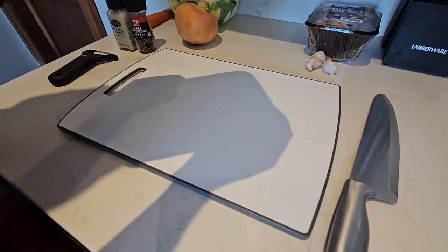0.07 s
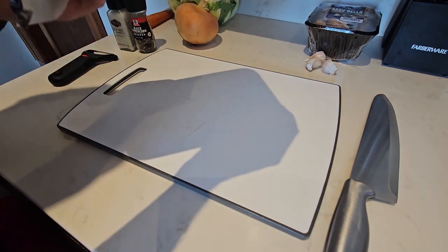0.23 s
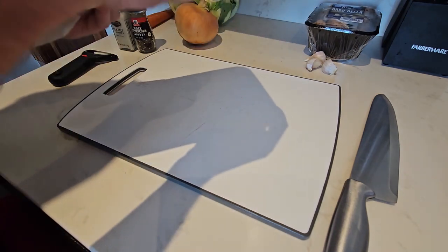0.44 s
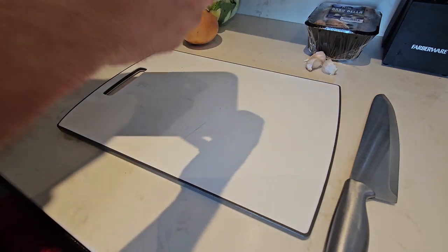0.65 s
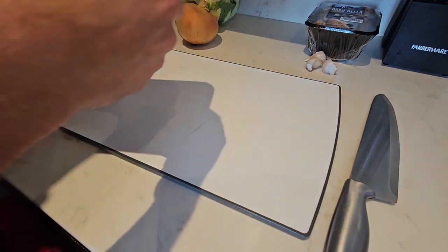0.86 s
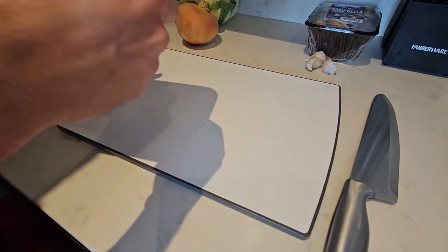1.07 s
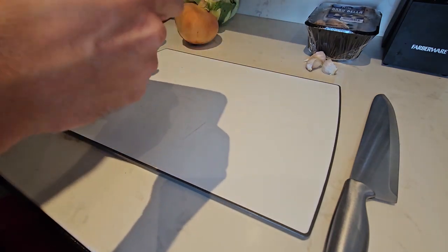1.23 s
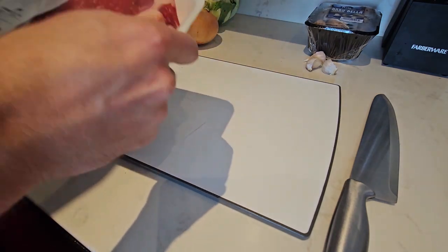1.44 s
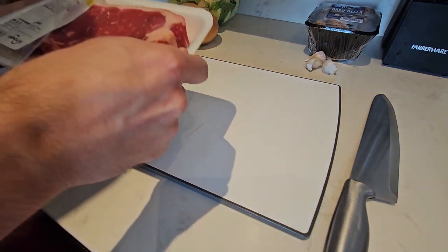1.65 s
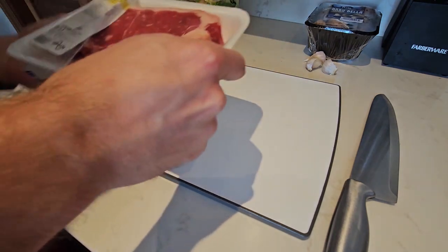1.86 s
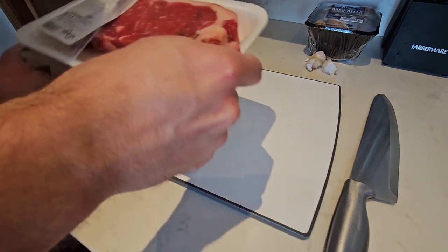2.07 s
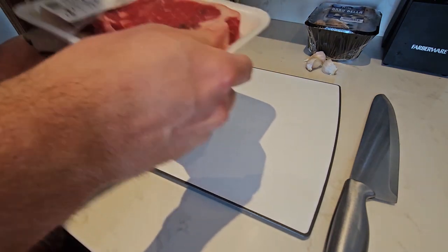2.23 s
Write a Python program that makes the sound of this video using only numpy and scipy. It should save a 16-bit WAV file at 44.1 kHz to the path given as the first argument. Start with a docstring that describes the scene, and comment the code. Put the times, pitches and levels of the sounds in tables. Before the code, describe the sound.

Plastic cling film crinkles and snaps as it is pulled off a foam tray, close up

```python
"""Cling film is pulled off a foam meat tray over a kitchen counter, close by and a little to the left.
Creases in the taut film snap as single clicks, and the stuck film lets go in hollow pops through the tray's modes.
Slack film rustles in random clicks and hiss, slips rub on the foam, and two loud snaps set the stiff rim ringing.
Hands shift and bump the tray; the counter scatters each crack, and a small, humming kitchen rings after it."""
import sys
import numpy as np
from scipy import signal
from scipy.fft import rfft, irfft
from scipy.io import wavfile

SR = 44100
rng = np.random.default_rng(int(sys.argv[2]) if len(sys.argv) > 2 else 0)


def wav_record(signal):
    """Record a signal, one row per channel, as 16-bit PCM in the file named by sys.argv[1]."""
    frames = np.transpose(np.atleast_2d(signal))
    bounded = np.clip(frames, -1, 1)
    # unit amplitude maps onto the largest positive 16-bit level
    quanta = np.round(bounded * 32767).astype(np.int16)
    wavfile.write(sys.argv[1], SR, quanta)


N = 101429  # length in samples, 2.3 s
HZ = np.fft.rfftfreq(4096, 1 / SR)  # frequencies at which the clicks are drawn


def amp(db):
    """Decibels to gain."""
    return 10 ** (np.asarray(db) / 20)


def unit(x):
    """Scales to an rms of one."""
    return x / np.sqrt(np.mean(x ** 2) + 1e-20)


def read(points, hz, axis=1):
    """Reads a column of a table along log frequency."""
    table = np.transpose(points)
    return np.interp(np.log(hz + 1), np.log(table[0] + 1), table[axis])


def add(mix, s, sound):
    """Mixes a stereo sound in at a time in seconds, cut off at the end of the mix."""
    part = mix[:, max(round(s * SR), 0):][:, :sound.shape[1]]
    part += sound[:, :part.shape[1]]


def pulse(db):
    """The sharpest causal (minimum-phase) click with this spectrum."""
    log_gain = np.log(amp(np.maximum(db, -100)))
    mirrored = np.r_[log_gain, log_gain[-2:0:-1]]
    return np.fft.ifft(np.exp(np.conj(signal.hilbert(mirrored)))).real


def ringing(modes):
    """Spectrum in dB of a body whose damped modes add in power."""
    power = 0
    for hz, width, db in modes:
        detuning = (HZ ** 2 - hz ** 2) / ((HZ + 1) * width)
        power = power + amp(db) ** 2 / (1 + detuning ** 2)
    return 10 * np.log10(power)


# Left-right likeness of diffuse sound. Each row: frequency in Hz, likeness from 0 to 1.
LIKENESS = [(30, 0.9), (130, 0.98), (300, 0.86), (600, 0.74), (1200, 0), (16000, 0.2)]


def diffuse(size):
    """Noise from all around: alike at both microphones in the bass, largely unrelated in the treble."""
    same = np.clip(read(LIKENESS, np.fft.rfftfreq(size, 1 / SR)), -1, 1)
    left, other = rfft(rng.standard_normal((2, size)))
    right = same * left + np.sqrt(1 - same ** 2) * other
    return irfft(np.array([left, right]), size)


SNAP_SCATTER_DB, POP_SCATTER_DB = 7, 2  # scatter against the direct sound
NEAR_S, FAR_S, FAR_DB = 0.0017, 0.012, -5  # decay times of the two parts of the scatter, start of the slow one
PAN_DB, LEFT_LEAD_S = 0.21, .00026  # left raised and right lowered by this; left arrives first
# First reflections off the counter and the hand. Each row: delay in seconds, strength against the direct sound.
FIRST_REFLECTIONS = [(.0007, 0.22), (.0014, 0.26), (.0024, 0.2)]


def paths(scatter_db):
    """Direct sound, first reflections and a quick spray of scatter, as they reach each microphone."""
    t = np.arange(4096) / SR
    decay = np.exp(-t / NEAR_S) + amp(FAR_DB) * np.exp(-t / FAR_S)
    spray = diffuse(len(t)) * decay * (1 - np.exp(-t / 0.00033))
    taps = amp(scatter_db) * spray / np.linalg.norm(spray[0])
    taps[:, 0] += 1  # direct sound
    for delay, strength in FIRST_REFLECTIONS:
        taps[:, round(delay * rng.uniform(.85, 1.15) * SR)] += strength
    taps[1] = np.roll(taps[1], round(LEFT_LEAD_S * SR))
    return taps / np.linalg.norm(taps[0]) * amp([[PAN_DB], [-PAN_DB]])


def grains(per_s, spread_db, count=6):
    """Random clicks of uneven size, shared out over several patches of film with their own paths."""
    out = np.zeros((2, N))
    for _ in range(count):
        size_db = spread_db * np.minimum(rng.exponential(1, N), 5.5)
        sizes = amp(size_db) * rng.choice([-1, 1], N)
        clicks = sizes * (rng.random(N) < per_s / count / SR)
        out += signal.fftconvolve(paths(SNAP_SCATTER_DB), clicks[None])[:, :N]
    return unit(out)


def shaped(drive, spectrum_db, curve):
    """Colours a sound and makes it follow a level curve."""
    sound = signal.fftconvolve(drive, pulse(spectrum_db)[None])[:, :N]
    return unit(sound) * amp(np.interp(np.arange(N) / SR, *np.transpose(curve)))


RUSTLE_DB = 2  # trim on the level curve
CRINKLES_PER_S, CRINKLE_SPREAD_DB, HISS_SHARE = 2200, 4.5, 0.68  # hiss as rms against the crinkles
# Swell of the slack film. Each row: time in seconds, level in dB before the trim.
RUSTLE_CURVE = [(0, -44.5), (.085, -55.5), (.14, -49), (.21, -52.5), (.33, -56.5), (.39, -57), (.5, -49),
                (.62, -52.5), (.76, -51.5), (.795, -58), (.85, -49), (.96, -57.5), (.995, -46), (1.10, -53),
                (1.139, -62), (1.21, -57), (1.248, -46.5), (1.30, -50), (1.379, -60.5), (1.5, -62),
                (1.73, -63.5), (1.785, -48.5), (1.83, -57), (1.89, -49), (1.94, -85), (2.0, -60),
                (2.08, -49), (2.16, -55.5), (2.21, -59), (2.29, -54.5)]
# Colour of the rustle. Each row: frequency in Hz, relative gain in dB.
RUSTLE_COLOUR = [(100, -41), (350, 0.5), (600, 3.5), (850, -6), (1300, 2.5), (2500, 3), (4500, 3.5),
                 (7500, 1.5), (10000, -2), (13000, -1), (16000, -3.5)]


def rustle():
    """Tiny crinkles over the hiss of film sliding on itself."""
    crinkles = grains(CRINKLES_PER_S, CRINKLE_SPREAD_DB)
    hiss = HISS_SHARE * rng.standard_normal((2, N))
    return amp(RUSTLE_DB) * shaped(crinkles + hiss, read(RUSTLE_COLOUR, HZ), RUSTLE_CURVE)


RUB_DB = -1.5  # trim on the level curve
RUB_GRAINS_PER_S, RUB_SPREAD_DB = 700, 3
# Fingers and film on the foam. Each row: time in seconds, level in dB before the trim.
RUB_CURVE = [(0, -59), (.06, -64), (.12, -49.5), (.24, -48), (.34, -69), (.95, -58), (1.02, -53),
             (1.14, -62), (1.21, -66), (1.24, -44.5), (1.34, -41), (1.45, -72), (1.62, -50), (1.80, -65),
             (1.90, -49.5), (1.95, -74), (2.20, -72), (2.28, -50.5)]
# Modes of the foam tray, also heard in the pops. Each row: frequency in Hz, width in Hz, relative level in dB.
TRAY_MODES = [(430, 98, -4), (539, 14, -14), (650, 72, -0.5), (620, 110, -0.5), (980, 73, 0.5),
              (1074, 86, -4.5), (1440, 103, -3), (1764, 72, -1.5), (2400, 1100, -11), (3186, 146, -8.5),
              (4680, 240, -11), (7900, 1200, -27.5), (13200, 1300, -35)]
# Colour of the foam, shared by rubbing and pops. Each row: frequency in Hz, relative gain in dB.
FOAM_COLOUR = [(60, -28), (200, -5.5), (320, -7), (420, 2), (1000, 0), (5000, -1.5), (16000, 1)]


def rubbing():
    """Small slips of fingers and film on the foam sound through the modes of the tray."""
    slips = grains(RUB_GRAINS_PER_S, RUB_SPREAD_DB)
    return amp(RUB_DB) * shaped(slips, ringing(TRAY_MODES) + read(FOAM_COLOUR, HZ), RUB_CURVE)


# Dull noise as the grip shifts. Each row: time in seconds, level in dB.
HANDLING_CURVE = [(0, -46), (.07, -49), (.16, -58), (.3, -60), (.4, -82), (1.2, -80), (1.3, -46),
                  (1.45, -68), (1.7, -70), (1.8, -66), (2.2, -61), (2.29, -59)]
# Colour of the handling. Each row: frequency in Hz, relative gain in dB.
HANDLING_COLOUR = [(60, -31), (180, -18), (320, 1.5), (480, -1.5), (650, -15.5), (900, -8), (2000, -48),
                   (16000, -69)]


def handling():
    """Hands sliding under the loaded tray: diffuse noise with the treble filtered away."""
    return shaped(diffuse(N), read(HANDLING_COLOUR, HZ), HANDLING_CURVE)


HUM_DB = -53  # rms level
# Colour of the kitchen hum. Each row: frequency in Hz, relative density in dB per Hz.
HUM_COLOUR = [(15, -33), (25, 3.5), (38, -26), (60, -3.5), (88, -3), (105, -6), (125, -2), (170, -4.5),
              (220, -1), (310, 0.5), (420, -6), (550, -14.5), (800, -19.5), (1500, -26.5), (3000, -23),
              (8000, -40), (16000, -65)]


def hum():
    """Steady low noise of the kitchen, from all around."""
    gain = amp(read(HUM_COLOUR, np.fft.rfftfreq(N, 1 / SR)))
    return amp(HUM_DB) * unit(irfft(rfft(diffuse(N)) * gain, N))


CREASE_RING_DB, CREASE_WIDTH_OCT = 1.5, 0.26  # boost at the crease's own pitch, and its reach to either side
# Creases snapping. Each row: start in seconds, relative level in dB, pitch of the crease in Hz,
# slope above it in dB per octave, floor in dB for the body below it.
CREASE_SNAPS = [(0.052, -11, 2480, -2.5, -5), (0.0556, -8, 2130, -2, -3.5), (0.13, -20, 3000, 3, -8),
                (0.1395, -8.5, 1390, -1, -13), (0.144, -10, 1850, -1, -22), (0.1924, -7, 11500, 5, -8),
                (.2434, 6.5, 1390, -11.5, -5.5), (0.3573, -6, 1180, -0.5, -5),
                (0.3622, 4, 2260, -0.2, -5.5), (.4513, 13.5, 2600, -6.5, -11), (0.555, 4, 1430, -2, -4.5),
                (.5650, 10, 2020, -9.5, -19), (0.722, -9, 1560, -8, -20), (0.8382, -6.5, 1530, -2.5, -7),
                (0.843, 3.5, 1520, -4.5, -9), (0.9293, -6.5, 1400, -5, -3.5), (.984, -10, 4970, -1, -0.5),
                (1.043, 4.5, 1070, -5, -2.5), (1.3012, 5, 5070, -6, -1), (1.5642, 12, 1460, -2, -4),
                (1.7702, -6.5, 5880, -16, -11), (1.8518, 1.5, 4610, -6.5, -11), (1.8968, -12, 3660, -8, 3),
                (1.9041, -7.5, 2940, -3.5, 0), (2.0186, 3, 3940, -4, -16), (2.0537, -11, 3860, -20, 0.5),
                (2.0634, -5.5, 4800, -11, -8)]
# Colour that all snaps share. Each row: frequency in Hz, relative gain in dB.
FILM_COLOUR = [(60, -30), (200, 0.5), (310, -8), (430, 5), (600, 2.5), (830, -6), (1250, 1), (2800, -0.5),
               (6200, -0.5), (7700, 0), (10000, -2.5), (13000, 0.5), (16000, -6.5)]


def snaps():
    """Each crease buckles in one click, with a boost around its own pitch."""
    out = np.zeros((2, N))
    for s, level_db, hz, slope_db, body_db in CREASE_SNAPS:
        octaves = np.log2((HZ + 1) / hz)
        above = slope_db * np.maximum(octaves, 0)
        below = np.maximum(10 * np.minimum(octaves, 0), body_db)  # falls 10 dB per octave to its floor
        ring = CREASE_RING_DB * np.exp(-(octaves / CREASE_WIDTH_OCT) ** 2)
        click = pulse(level_db + above + below + ring + read(FILM_COLOUR, HZ))
        add(out, s, signal.fftconvolve(paths(SNAP_SCATTER_DB), click[None]))
    return out


POP_PAN_DB = 0.5  # further lean to the left: left raised, right lowered
# Film letting go of the foam. Each row: start in seconds, relative level in dB, brightness in dB per octave,
# pitch of the tray as the grip changes, as a ratio.
FILM_POPS = [(.101, -5, 0.27, 1.26), (.2475, -2.5, -2.4, 1.33), (.2842, -7, -1.5, 1.35),
             (1.1161, 7, 0.96, 0.79), (1.226, 1.5, 2.6, 0.88), (1.2878, -2, -3.1, .98),
             (1.3259, 8, -2.3, 0.99), (1.3409, 7.5, -.8, 1.02), (1.3563, 11, -1.4, .99),
             (1.4125, 16.5, 0.61, 1.02), (1.444, 11, -0.5, 1.01), (1.5156, 17, -0.44, 0.99),
             (1.5285, 11, -0.95, 0.9), (1.5477, 15, -0.64, 1.02), (1.5621, 12, -0.94, 0.98),
             (1.5955, 14.5, -1.3, .99), (1.6615, 16, 0.6, 1.02), (2.066, .5, -0.46, 0.95),
             (2.227, -6, -1.9, 1.1)]


def pops():
    """Each release of the film kicks the light, well-damped tray."""
    octaves = np.log2(np.maximum(HZ, 300) / 1000)  # tilt turns about 1 kHz and levels off below 300 Hz
    out = np.zeros((2, N))
    for s, level_db, bright_db, ratio in FILM_POPS:
        modes = [(hz * ratio, width, db) for hz, width, db in TRAY_MODES]
        tray_db = ringing(modes) + read(FOAM_COLOUR, HZ)
        kick = pulse(level_db + tray_db + bright_db * octaves)
        add(out, s, signal.fftconvolve(paths(POP_SCATTER_DB), kick[None]))
    return out * amp(np.array([[1], [-1]]) * POP_PAN_DB)


# The rim ringing with two loud snaps. Each row: start in seconds, relative level in dB.
RIM_RINGS = [(.4514, 21.5), (.5649, 4)]
# Modes of the rim. Each row: frequency in Hz, width in Hz, relative level in dB.
RIM_MODES = [(577, 70, -7), (1110, 91, -5.5), (1233, 110, -6), (1755, 140, 1.5), (2300, 450, -2),
             (2800, 60, 3.5), (3420, 390, -3.5)]


def rim_rings():
    """Two loud snaps set the tray's stiff rim ringing for a moment."""
    out = np.zeros((2, N))
    for s, level_db in RIM_RINGS:
        ring = pulse(level_db + ringing(RIM_MODES))
        add(out, s, signal.fftconvolve(paths(POP_SCATTER_DB), ring[None]))
    return out


# The tray bumped in the hands. Each row: start in seconds, level in dB before the envelope,
# pitch in Hz, decay time in seconds.
TRAY_BUMPS = [(1.302, -24.5, 380, 0.0078), (1.301, -30.5, 176, 0.0079)]


def bumps():
    """Dull, quickly dying knocks of the loaded tray, as soft-edged sine bursts in the centre."""
    out, t = np.zeros((2, N)), np.arange(SR // 4) / SR
    for s, level_db, hz, ring in TRAY_BUMPS:
        envelope = np.exp(-t / ring) * (1 - np.exp(-t / 0.00091))
        knock = amp(level_db) * np.sin(2 * np.pi * hz * t) * envelope
        add(out, s, np.tile(knock, (2, 1)))
    return out


# Kitchen reverberation. Each row: frequency in Hz, time to fall 60 dB in seconds, relative level in dB.
KITCHEN_ROOM = [(150, 0.59, -16), (550, 0.51, -8.5), (1170, 1, -13.5), (2880, 0.68, -11.5),
                (6000, 0.56, -11.5), (15000, .3, -13.5)]


def kitchen(x, build_s=0.0067):
    """A diffuse tail that builds quickly, lingers in the upper middle and dies soonest in the top treble."""
    hz, t, z = signal.stft(diffuse(SR), SR, nperseg=256)
    t60 = read(KITCHEN_ROOM, hz)[:, None]
    # the square root keeps a band's level from growing with its decay time
    fade = np.exp(-np.log(1000) * t / t60) * np.sqrt(2 * np.log(1000) / t60 / SR)
    level = amp(read(KITCHEN_ROOM, hz, axis=2))[:, None]
    tail = signal.istft(z * fade * level, SR, nperseg=256)[1]
    tail = tail * (1 - np.exp(-(np.arange(tail.shape[1]) / SR / build_s) ** 2))
    return signal.fftconvolve(x, tail, axes=1)[:, :N]


def scene():
    """Film and tray ring in the kitchen; handling and hum stay without its tail."""
    near = rustle() + rubbing() + snaps() + pops() + rim_rings() + bumps()
    return near + kitchen(near) + handling() + hum()


CUTOFF_HZ = 16050


def record(dry):
    """The recorder's band limit, a steep low-pass."""
    lowpass = signal.firwin(255, CUTOFF_HZ, window=("kaiser", 9), fs=SR)
    return signal.oaconvolve(dry, lowpass[None], "same")


dry = scene()
out = record(dry)
wav_record(out)
```